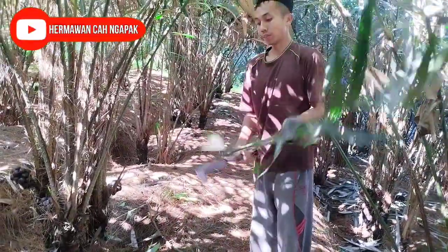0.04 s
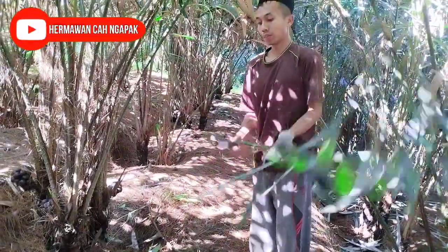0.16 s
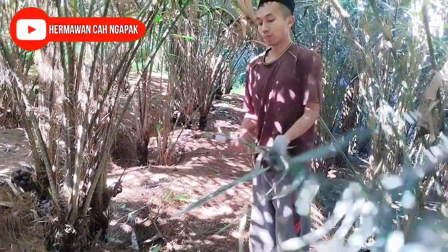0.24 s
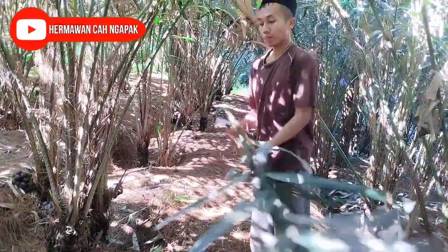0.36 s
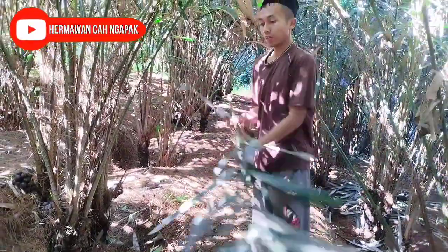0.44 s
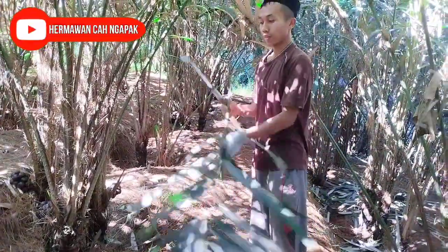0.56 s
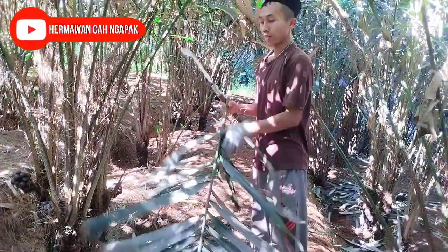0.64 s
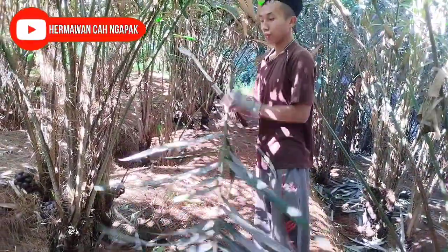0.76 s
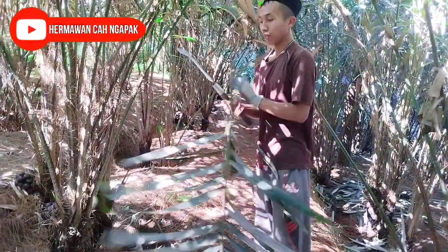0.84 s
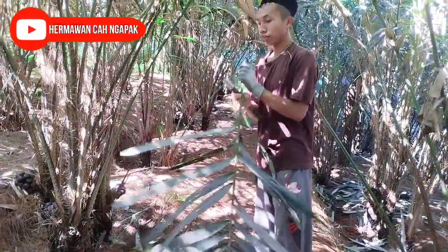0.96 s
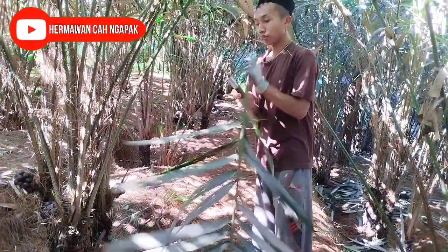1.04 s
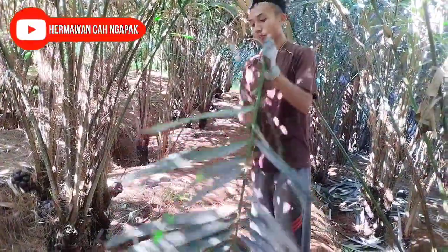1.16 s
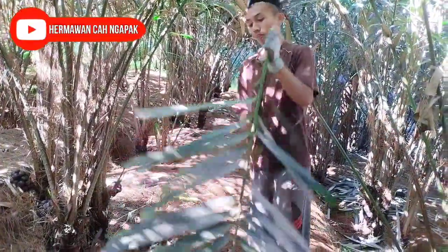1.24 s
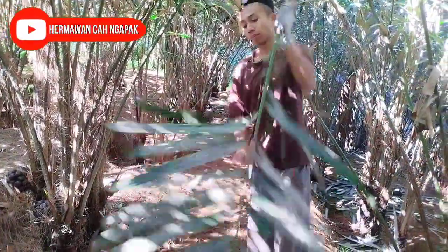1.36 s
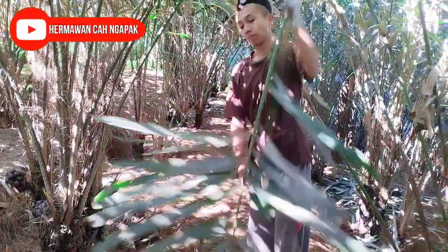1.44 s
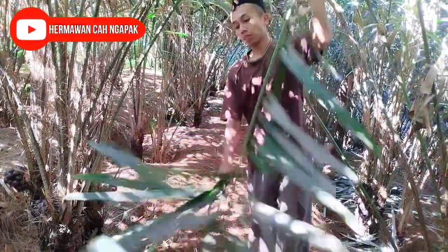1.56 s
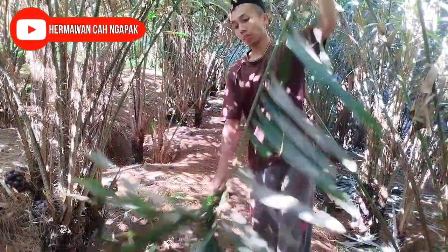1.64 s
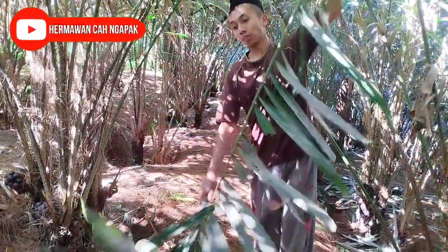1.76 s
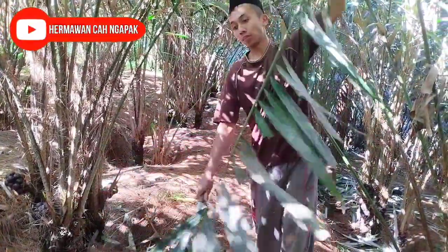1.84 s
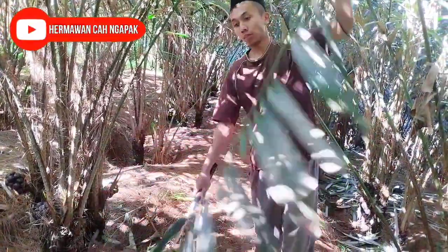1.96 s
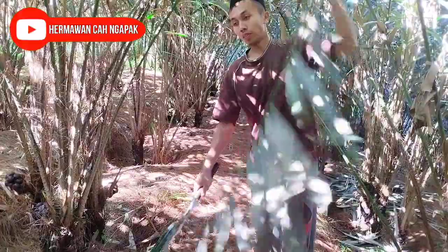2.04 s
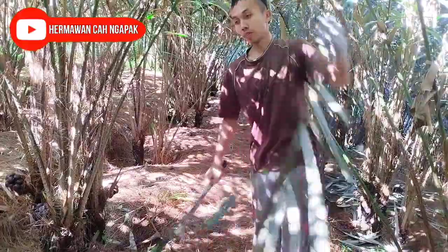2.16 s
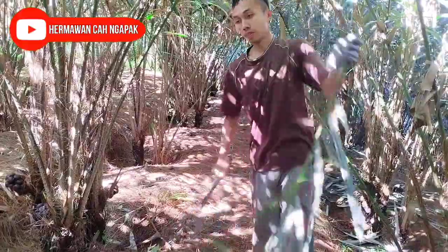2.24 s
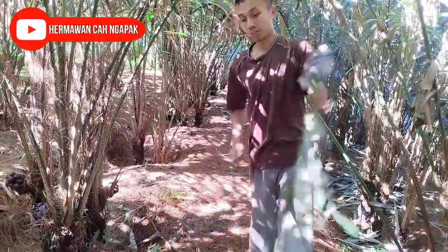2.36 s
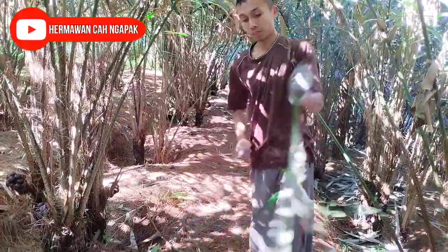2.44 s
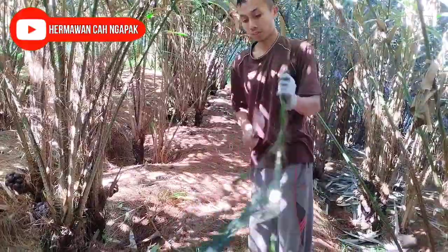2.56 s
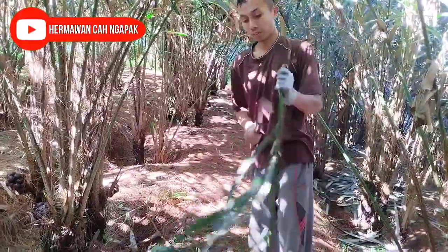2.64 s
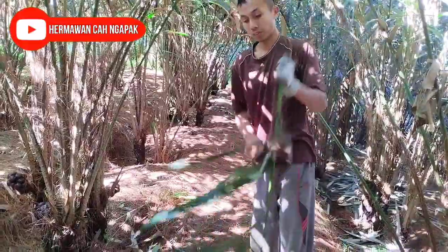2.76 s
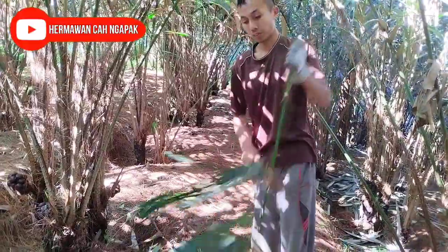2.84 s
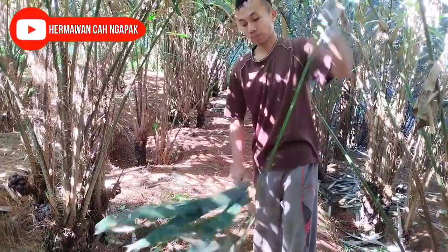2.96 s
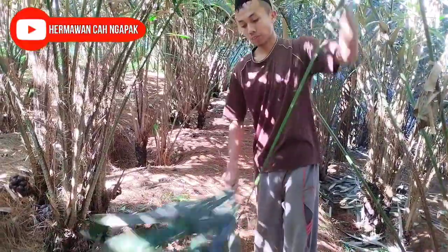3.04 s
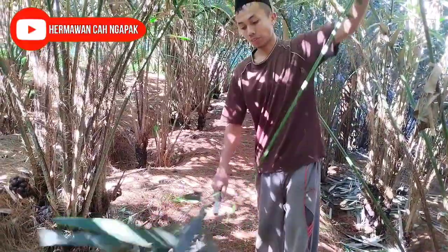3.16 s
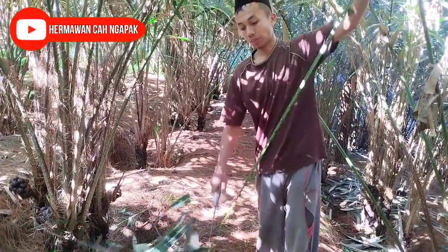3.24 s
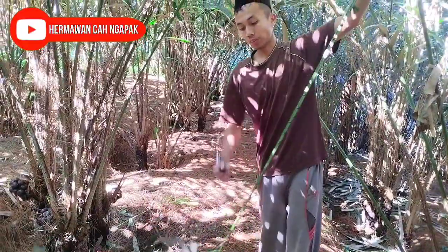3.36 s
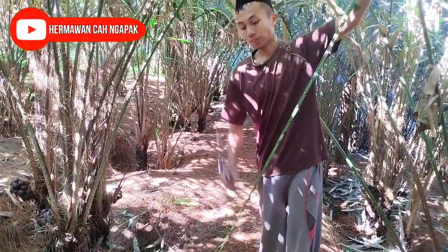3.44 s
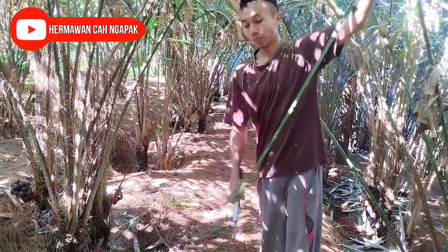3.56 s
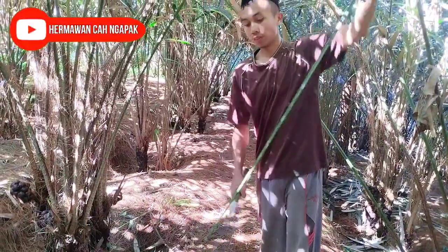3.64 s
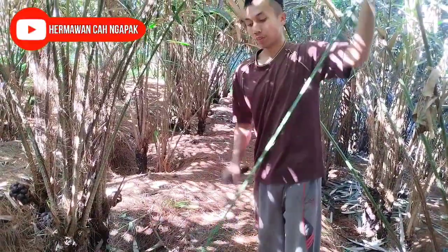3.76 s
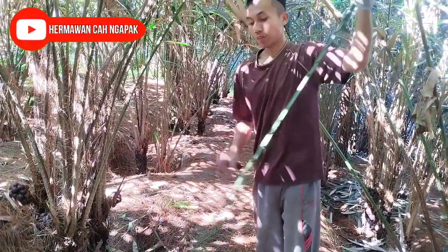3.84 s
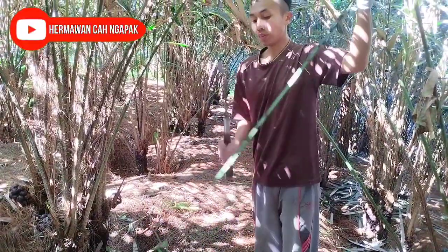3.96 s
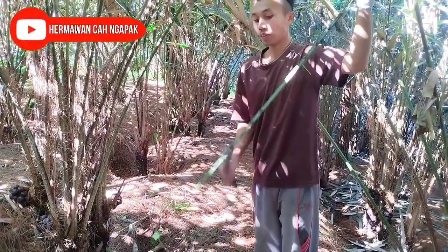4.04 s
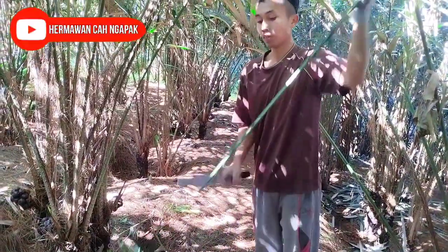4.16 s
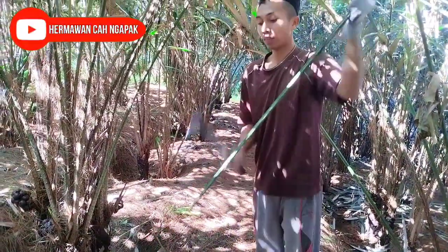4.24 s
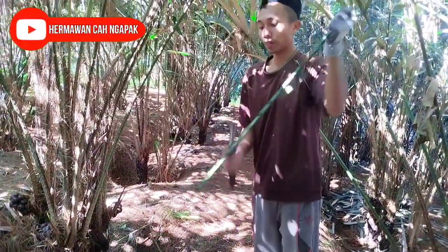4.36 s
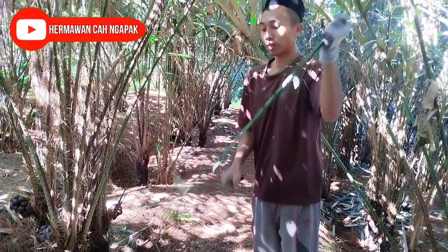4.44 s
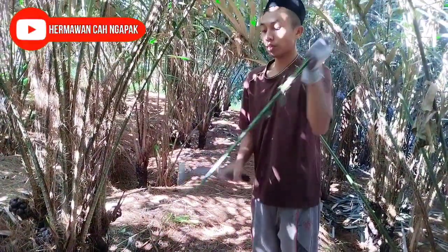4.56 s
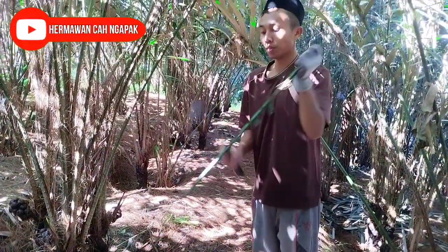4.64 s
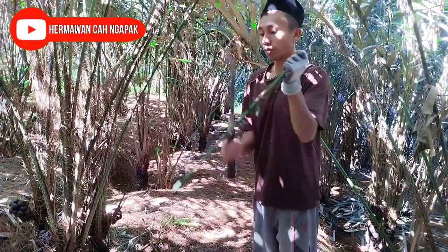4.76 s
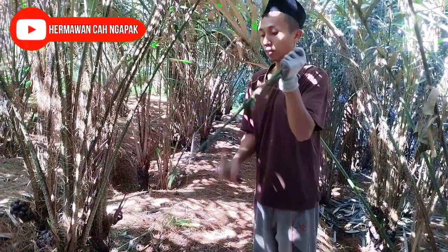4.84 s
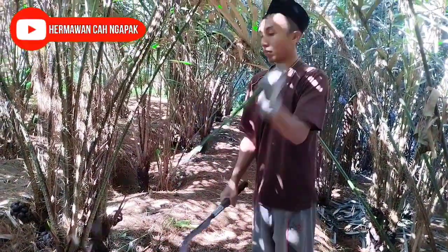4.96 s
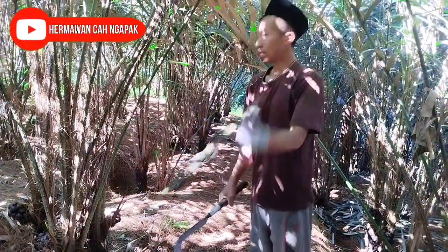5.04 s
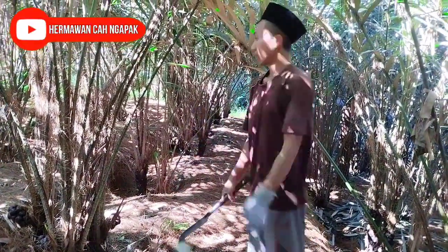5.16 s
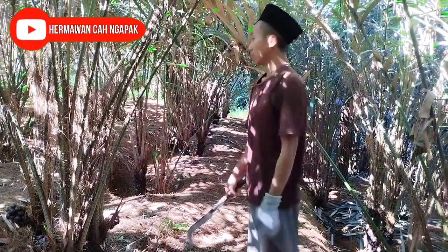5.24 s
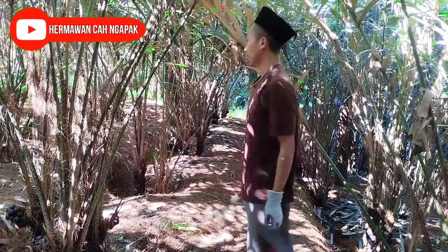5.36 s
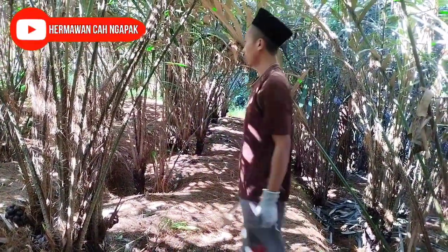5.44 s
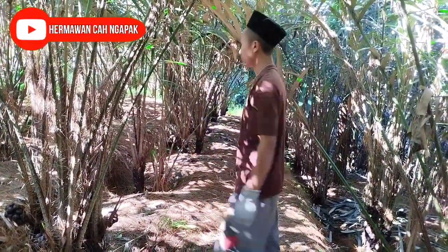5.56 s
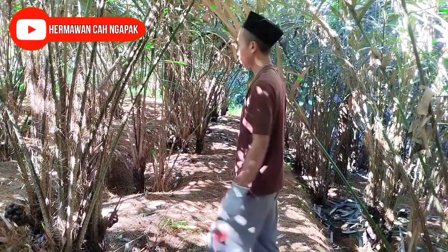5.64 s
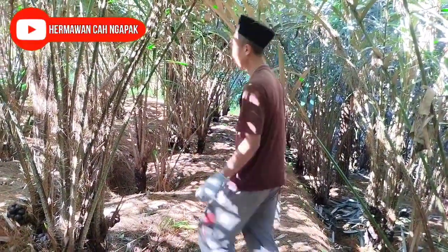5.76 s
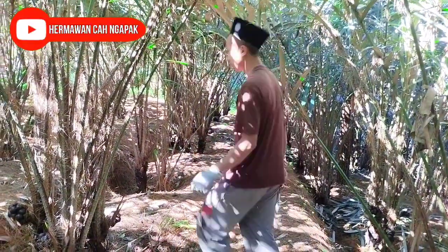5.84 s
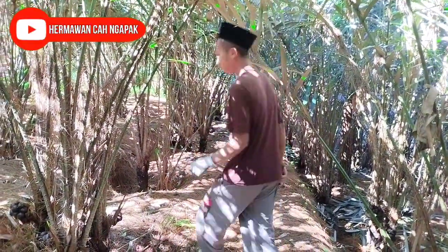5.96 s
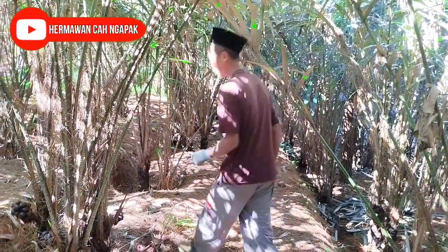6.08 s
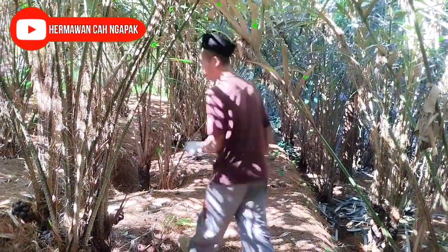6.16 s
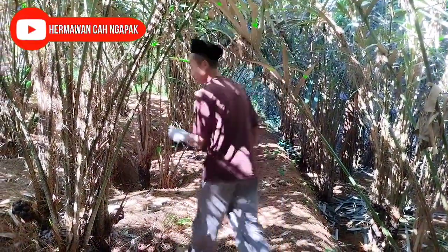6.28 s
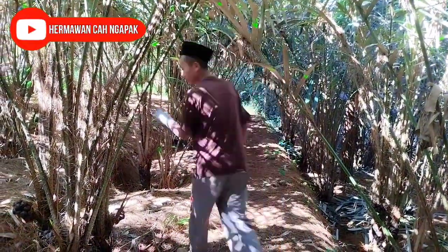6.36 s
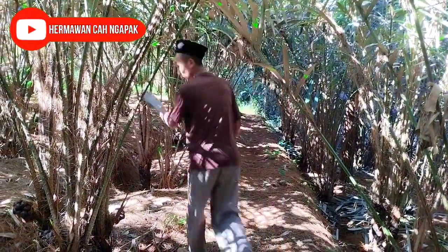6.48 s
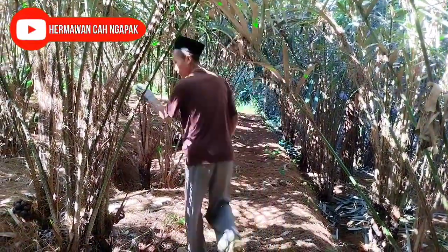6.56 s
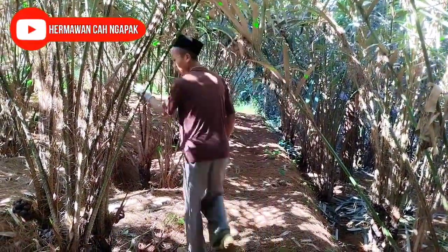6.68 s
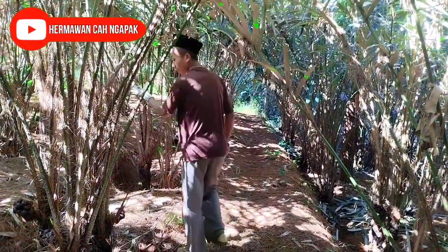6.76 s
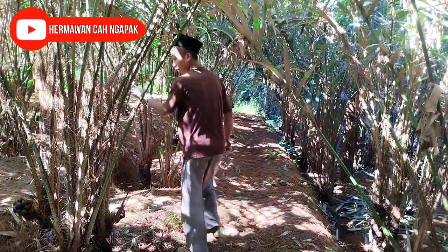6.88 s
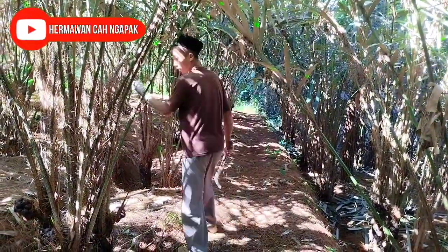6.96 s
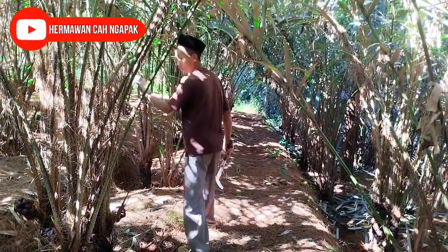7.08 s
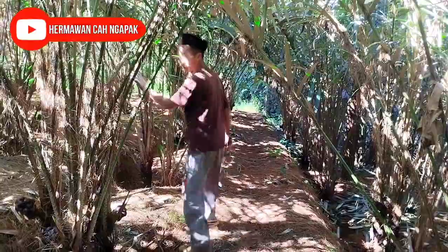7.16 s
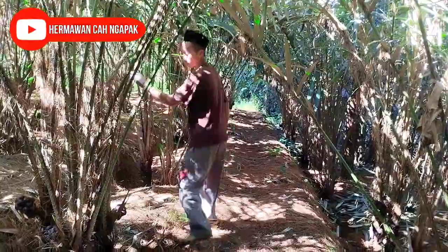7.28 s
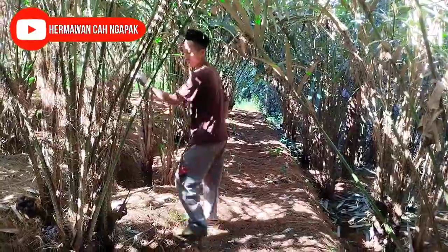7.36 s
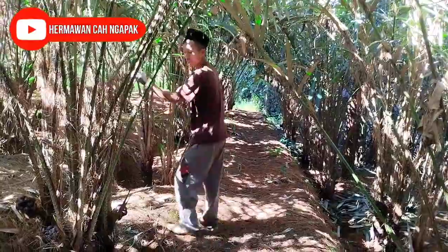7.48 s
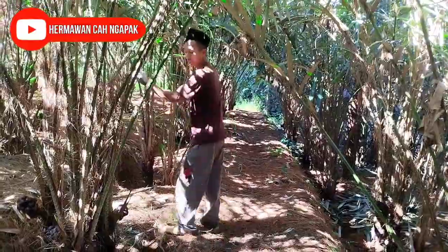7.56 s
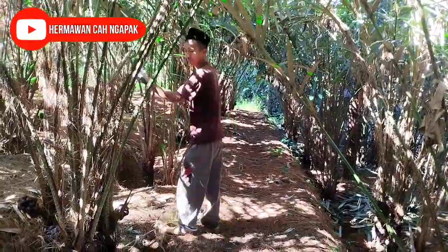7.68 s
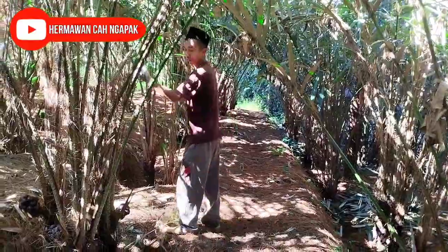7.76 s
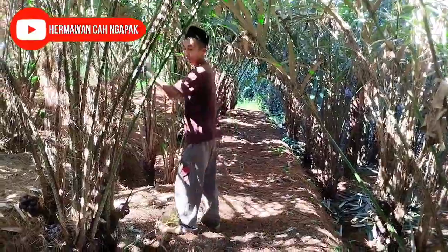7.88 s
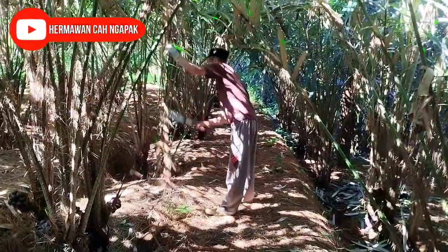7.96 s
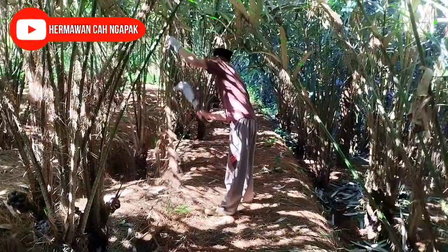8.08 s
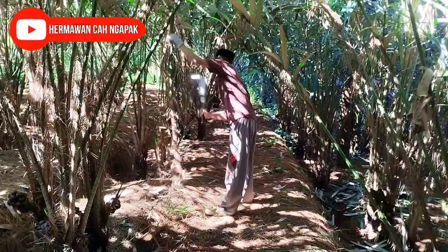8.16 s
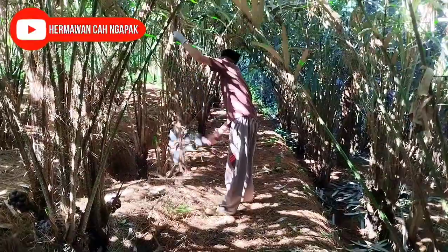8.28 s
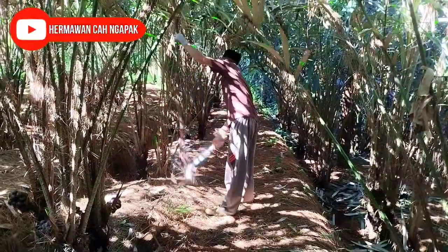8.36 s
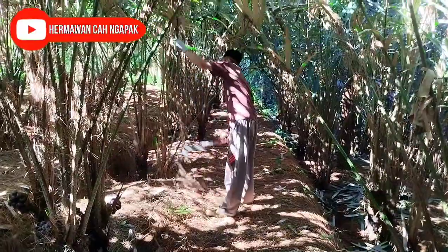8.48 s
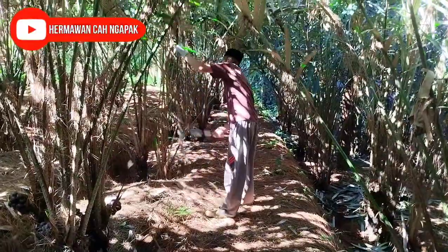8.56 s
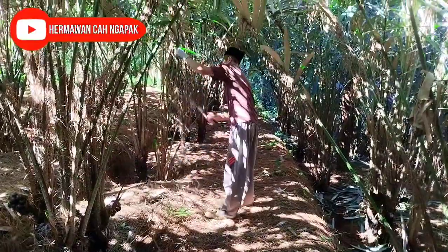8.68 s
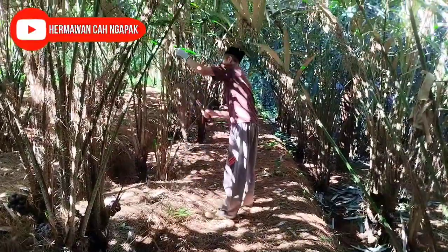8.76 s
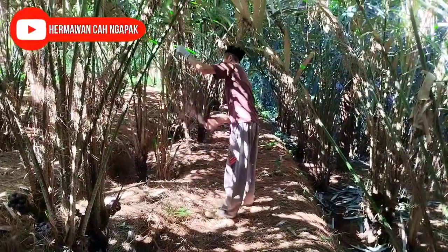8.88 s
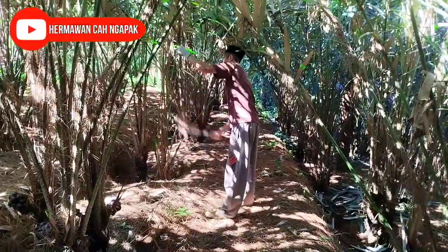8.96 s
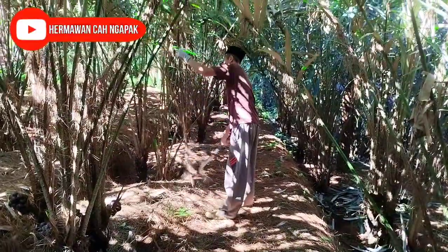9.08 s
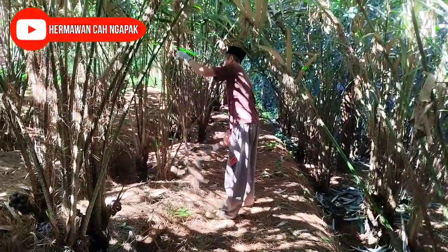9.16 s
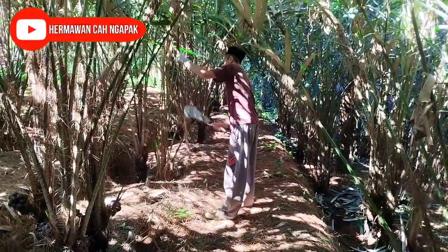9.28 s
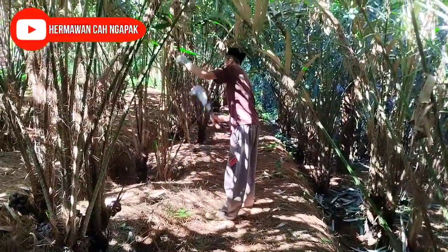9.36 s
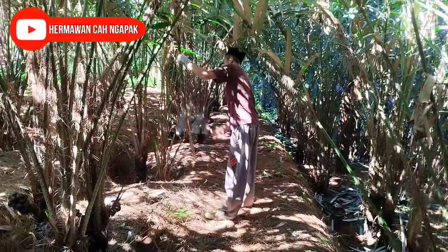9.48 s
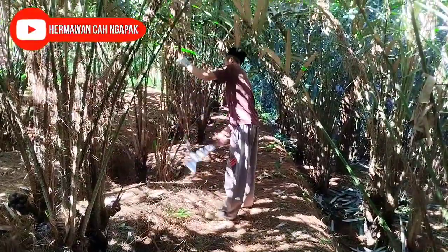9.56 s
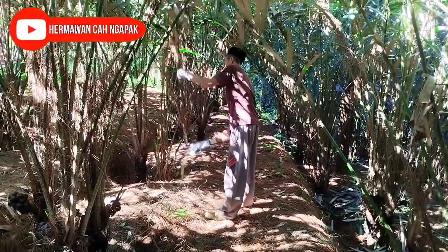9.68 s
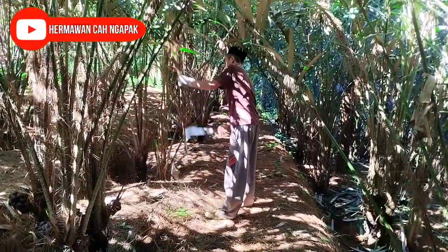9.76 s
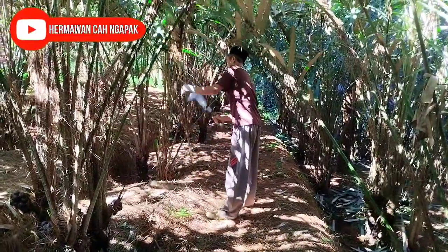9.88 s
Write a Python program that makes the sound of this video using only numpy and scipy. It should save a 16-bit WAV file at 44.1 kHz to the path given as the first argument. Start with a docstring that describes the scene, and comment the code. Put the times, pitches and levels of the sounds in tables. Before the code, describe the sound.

Close to the microphone in an outdoor grove, a dry frond is dragged and shaken with harsh leafy rustles and dense brittle snaps. Separate crisp blade chops follow, with brief faint metallic ringing. Soft steps shuffle away over dry litter, then rustling and sparse cuts continue farther off. Insects hiss thinly, a distant engine drones low, and small birds chirp faintly.

```python
"""In a grove, a spiny palm frond is dragged from its clump, stripped of its leaflets and chopped with a curved blade.
Leaves rustle, fibres snap and the blade rings briefly; after a few steps on dry litter the cutting goes on farther off.
Leaves, breaks and steps are bursts of tiny random clicks shaped by filters; stalk and blade ring as fading tones.
Stems echo softly, small birds chirp, insects hiss, and a distant engine drones with a thin whine."""
import sys
import numpy as np
from scipy import signal
from scipy.fft import rfft, irfft, next_fast_len
from scipy.io import wavfile

SR = 44100
rng = np.random.default_rng(int(sys.argv[2]) if len(sys.argv) > 2 else 0)


def put_to_file(sound):
    """Save the sound as 16-bit audio at rate SR, in the file named by the first command-line argument."""
    columns = np.atleast_2d(sound).T  # one column per channel
    safe = np.clip(columns, -1, 1)
    whole_steps = np.round(safe * 32767)
    wavfile.write(sys.argv[1], SR, whole_steps.astype(np.int16))


N = 437031
TIME = np.arange(N) / SR  # seconds

# Tugs and sweeps of the frond. Each row: start in seconds, rubbing level in dB before the band trims,
# rise in seconds, hold in seconds, time to fade by 60 dB in seconds,
# then flexing and scratching in dB relative to the rubbing.
SWEEPS = [(0.0, -30, 0.0013, 0.014, .17, -8.5, 0.5), (0.066, -47, 0.017, 0.05, 0.36, -3.5, -3),
          (0.15, -44, .005, 0.0091, 0.43, -6, -3), (0.226, -37.5, 0.029, 0.011, 0.26, -6.5, -4),
          (0.288, -26, 0.016, 0.029, .3, -11, -7), (0.35, -24.5, 0.017, 0.017, 0.74, -8, -7.5),
          (0.726, -47, .008, 0.058, 0.6, -6, -5), (0.958, -52.5, 0.0079, 0.12, .3, -5, -4.5),
          (1.095, -27.5, 0.0041, 0.0089, 0.46, -5.5, -6), (1.171, -30.5, .008, 0.019, 0.2, -10, -3.5),
          (1.229, -29, 0.0075, 0.039, 0.45, -4, -7), (1.35, -31.5, .005, 0.086, 1.03, -4.5, -5),
          (1.483, -30, 0.077, 0.069, 0.67, -11, -11.5), (1.771, -36, 0.0072, 0.095, .4, -6.5, -7.5),
          (1.842, -26.5, 0.1, .01, 0.53, -12.5, -10.5), (2.011, -35.5, 0.044, 0.27, 0.46, -12, -9),
          (2.401, -43, .015, 0.094, .3, -9, -9), (2.559, -39.5, .005, 0.037, 0.33, -7.5, 2),
          (2.61, -31, 0.029, 0.013, 0.18, -6.5, -6), (2.697, -31, 0.028, 0.077, .4, -8, -4),
          (2.844, -28, 0.0077, 0.023, .22, -8, 0), (2.903, -28.5, 0.014, 0.026, 0.48, -9, -7),
          (2.998, -34.5, 0.086, 0.24, .6, -10.5, -9.5), (3.341, -30, .007, .01, .25, -8.5, -8),
          (3.418, -35, 0.017, .06, 0.5, -11, -9), (3.71, -40.5, 0.019, .015, 0.47, -6.5, -9),
          (4.297, -59.5, .05, .13, 0.47, -12, -13), (5.23, -47, 0.03, 0.18, 0.64, -9.5, -12),
          (7.548, -48.5, 0.0086, 0.057, .3, -20, -4), (7.589, -35, 0.076, 0.041, .08, -14, -2.5),
          (7.724, -37.5, 0.083, .01, 0.47, -5, -6), (7.882, -47.5, .04, .015, 2.7, -5, -10),
          (8.212, -49.5, 0.12, 0.037, 1.13, -8, -5.5), (8.639, -42.5, .006, 0.02, .2, -5.5, 2),
          (8.677, -33, .02, 0.011, 0.36, -13.5, -5), (8.758, -34.5, 0.04, 0.0086, 0.2, -10, -1),
          (8.86, -53.5, 0.1, 0.075, 1, -6.5, -7), (9.348, -45, 0.063, .03, .4, -3.5, -7),
          (9.45, -40, 0.028, .015, 0.44, -7.5, -6), (9.517, -38.5, 0.026, 0.022, 0.74, -5, -7)]
# Louder leaflets and twigs snapping. Each row: time in seconds, level in dB before the snaps' shared trim,
# brightness in dB per octave, rib resonance in Hz.
SNAPS = [(0.1555, -23, 1.5, 2980), (0.5104, -31, -2, 3650), (0.6616, -24.5, 0.5, 3600),
         (0.7497, -25.5, -0.5, 3740), (1.178, -11.5, -1, 4300), (1.1923, -11.5, -4, 5400),
         (1.2391, -15.5, 4, 3500), (1.2513, -14.5, 2, 2340), (1.268, -9.5, 1, 3340),
         (1.3556, -10, -1.5, 5570), (1.3896, -18, -5, 3400), (1.451, -17, 2, 4550),
         (1.7742, -19, 1.5, 3770), (2.0097, -14.5, 1.5, 3660), (2.153, -21, 2, 3230),
         (2.2383, -16, 0.5, 3500), (2.3067, -20, -0.5, 3500), (2.565, -17, 3, 6100),
         (2.6292, -17.5, 2.5, 6300), (2.646, -11, 3.5, 2920), (2.704, -13.5, 2, 5880),
         (2.7218, -7.5, 0, 5000), (2.7653, -11.5, -1, 3300), (2.7856, -9, -1.5, 3300),
         (2.8012, -13, -1, 4700), (3.194, -18, -2.5, 3800), (3.348, -13, 3.5, 3620), (3.437, -24, 1, 3920),
         (3.693, -23.5, 0, 4000), (3.7377, -22, 2.5, 3700), (5.375, -36, -2, 4200),
         (5.535, -38.5, -2, 4000), (6.2088, -26.5, 2, 6340), (6.8898, -25, -3, 4460),
         (6.9415, -27, -0.5, 4560), (7.3128, -42.5, -2, 3800), (7.438, -37.5, 3, 4620),
         (7.464, -37, 2, 6180), (7.6393, -18, 5, 5230), (7.8043, -21, 2, 6100), (8.965, -28.5, 0.5, 2260)]
# Blade through the stalk. Each row: time in seconds, level in dB, length of the break in seconds,
# brightness in dB per octave, stalk resonance in Hz, blade ring in dB.
CHOPS = [(3.92, -18.5, 0.0049, 0.5, 5870, -30), (4.265, -19, 0.0067, 0, 5800, -37),
         (4.683, -16.5, 0.0067, -0.5, 6050, -40), (5.006, -20, 0.0028, -4, 4000, -53),
         (5.126, -23, 0.0049, -5, 3150, -57), (5.199, -20, 0.0025, -4, 3570, -51),
         (5.203, -21.5, 0.0073, -4, 2970, -54), (7.667, -27, 0.0055, 0.5, 5670, -47),
         (8.0948, -17.5, 0.0046, -1, 5800, -49), (8.693, -29.5, 0.0095, -1, 5340, -36),
         (9.309, -20, 0.0051, -1.5, 2720, -41), (9.848, -22, 0.006, -1.5, 4020, -52)]
# Blade sliding along the fibres. Each row: time in seconds, level in dB, length in seconds,
# brightness in dB per octave.
SLICES = [(4.206, -24.5, 0.0074, -0.5), (4.221, -30.5, 0.029, -.5), (4.574, -29, 0.022, -1),
          (4.608, -27.5, 0.012, -1), (4.976, -46, .01, 3), (4.986, -29, .01, -1),
          (5.012, -26.5, 0.0088, -0.5), (5.132, -28, 0.023, -2.3), (5.213, -26.5, 0.0074, -1.5),
          (9.32, -43, .015, 5), (9.861, -38, 0.018, -1)]
# Hollow knocks of the cut stalk. Each row: time in seconds, level in dB.
KNOCKS = [(5.128, -30.5), (5.2, -42)]
# Ringing tones of stalk and blade. Each row: pitch in Hz, average relative strength in dB,
# time to fade by 60 dB in seconds.
STALK_MODES = [(646, 0, .14), (560, -5, .08), (730, -8, .06), (1150, -13, .06)]
BLADE_MODES = [(2000, -2, .09), (2590, -3, .09), (5850, -2, .08), (6780, -13, .05)]
# Soft bumps of frond and feet. Each row: time in seconds, level in dB, pitch of the thud in Hz.
BUMPS = [(1.24, -41, 474), (1.356, -39, 400), (3.093, -39, 395), (6.889, -52, 300)]
# Feet on dry litter. Each row: start in seconds, level in dB.
STEPS = [(5.58, -56), (5.67, -56), (5.78, -63), (5.96, -59), (6.08, -59), (6.19, -48), (6.29, -57),
         (6.45, -59.5), (6.85, -52), (6.95, -55), (7.045, -54), (7.33, -60)]
# A footfall presses the litter down and lets it settle.
STEP_RISE_S, STEP_HOLD_S, STEP_T60_S = 0.025, 0.014, 0.43
# Small birds. Each row: start in seconds, level in dB, middle pitch in Hz.
CHIRPS = [(7.07, -55, 7400), (7.13, -60, 2750), (7.193, -53, 3200), (7.378, -60, 2750)]

# Colours, meaning the balance of low and high in each sound.
# Each row: frequency in Hz, relative strength in dB per Hz.
LEAF_COLOUR = [(76, -85), (130, -15), (309, -14.5), (363, -11), (522, -8), (706, -14), (1220, -10.5),
               (1710, -16), (1970, -9.5), (3200, -1), (3610, 1.5), (9290, -13.5), (11600, -9.5),
               (15100, -24), (16000, -38)]
FAR_LEAF_COLOUR = [(76, -41), (130, -14), (156, -19), (444, -15), (638, -18), (720, -16.5), (954, -10),
                   (1290, -16.5), (2180, -9), (3530, -2.5), (4070, -3.5), (4980, -1), (8400, -11),
                   (11100, -9), (16000, -23)]
SNAP_COLOUR = [(76, -19.5), (130, -24), (370, -14.5), (613, -7.5), (1140, 0), (1780, -4.5), (1970, 2),
               (2510, 3.5), (3330, 3.5), (4150, 0.5), (4780, 4.5), (11600, -9), (16000, -23)]
CHOP_COLOUR = [(76, -63), (130, -26.5), (554, -16), (1140, -7.5), (1370, -10.5), (1490, -7.5), (1710, -12),
               (2010, -7), (2180, -2.5), (2830, -1), (4240, 1), (5730, 3), (6730, 1.5), (11400, -2.5),
               (16000, -17.5)]
SLICE_COLOUR = [(76, -48), (130, -21), (253, -16), (394, -11), (625, -6), (954, -14.5), (1240, -8),
                (2510, -4.5), (2950, 3.5), (3830, 3.5), (5960, -4), (6470, -4), (10500, -9.5), (12600, -12),
                (16000, -29)]
AIR_COLOUR = [(15, -2.5), (30, 2.5), (50, -4.5), (100, -5), (200, -14), (400, -18), (900, -20.5),
              (1800, -19), (3500, -24.5), (7000, -50), (13000, -43), (16000, -48)]
CANOPY_COLOUR = [(700, -39), (2000, -4), (3300, -1.5), (5000, 0.5), (8000, -3), (12000, -20), (16000, -17)]
INSECT_COLOUR = [(7000, -28), (8300, -11.5), (9400, -2.5), (10500, 0.5), (11500, -6), (12600, -17.5),
                 (14500, -30)]

# Speed of the distant engine. Each row: time in seconds, firings per second.
ENGINE_SPEED = [(0, 67.7), (1, 69.2), (2, 73), (2.2, 71), (2.7, 70.5), (2.9, 72.2), (3.6, 73), (4.35, 75.2),
                (4.7, 74.2), (6, 74.7), (6.35, 76), (6.5, 74.6), (7.15, 77), (7.6, 71), (7.75, 65.3),
                (8.7, 63), (9.5, 60), (9.9, 56)]
# Loudness of its firing note. Each row: time in seconds, level in dB before the engine trim and waver.
ENGINE_LEVEL = [(0.0, -61.5), (1.74, -53.5), (2.59, -56.5), (2.73, -68), (2.87, -51.5), (4.99, -64),
                (5.11, -72), (7.2, -64), (7.34, -72), (7.84, -48), (7.92, -52.5), (9.55, -56.5), (9.8, -60),
                (9.91, -58)]
# Its faint upper tones. Each row: multiple of the firing rate, average level in dB.
ENGINE_ORDERS = [(5, -80), (8, -75.5), (14, -74), (15, -79)]
# The engine's octave swells as the revs bring it onto an exhaust resonance (level before the engine trim).
OCTAVE_DB, EXHAUST_HZ, EXHAUST_WIDTH_HZ, EXHAUST_LIFT_DB = -68, 153.1, 3, 10
# A faint far whine. Each row: time in seconds, middle pitch in Hz, level in dB before the whine trim.
WHINE = [(5.8, 926, -78), (6.08, 930, -59), (6.4, 933, -67), (6.62, 930, -66), (7.0, 940, -83),
         (7.3, 930, -68), (7.6, 912, -69), (8.0, 905, -76)]
AIR_DB, CANOPY_DB, INSECT_DB = -57.5, -72, -55.5
CRICKET_HZ, CRICKET_DB = 4630, -73
CUTOFF_HZ = 16000


def effort():
    """Strength of rubbing, flexing and scratching over time; overlapping sweeps add in power."""
    power = np.zeros((3, N))
    for s, db, rise, hold, t60, flex_db, scratch_db in SWEEPS:
        shape = swell(rise, hold, t60)
        for track, share_db in zip(power, (0, flex_db, scratch_db)):
            add(track, s, from_db(db + share_db) ** 2 * shape)
    return np.sqrt(power)


def swell(rise, hold, t60, count=60000):
    """Power of one movement: it builds up, holds and dies away."""
    t = np.arange(count) / SR
    build = np.minimum(t / rise, 1)
    fade = from_db(-60 * np.maximum(t - rise - hold, 0) / t60)
    return (build * fade) ** 2


def rustle(gains, mid_db=-0.64, low_db=-1.77, treble_db=-1.3):
    """Each movement rubs leaf blades (mid), flexes whole leaves (low) and scratches with spines (treble)."""
    flicks = leaflets()
    near = leaves(LEAF_COLOUR, clump_db=3.0, spread_db=2.5, hiss_db=-3.0, flicks=from_db(-5.5) * flicks)
    far = leaves(FAR_LEAF_COLOUR, clump_db=2.5, spread_db=1.5, hiss_db=-3.5, flicks=from_db(-4.5) * flicks)
    source = np.where(TIME < 7, near, far)  # the work goes on farther off from 7 s
    zones = [(1800, 7500), (130, 1800), (7500, 17000)]  # Hz, in the order of the gains
    out = np.zeros(N)
    for zone, zone_db, gain in zip(zones, (mid_db, low_db, treble_db), gains):
        band_filter = signal.butter(4, zone, "band", fs=SR, output="sos")
        band = rms_one(signal.sosfilt(band_filter, source))
        out += from_db(zone_db) * gain * band
    return out


def leaves(colour, clump_db, spread_db, hiss_db, flicks=0):
    """Dry leaves catch and slip: clumped crackles and any flicks over a smooth rubbing hiss."""
    clicks = grains(N, 5000, spread_db)
    clumping = from_db(clump_db * (drift(260) + 0.96 * drift(90)))
    crackle = rms_one(clicks * clumping)
    hiss = from_db(hiss_db) * rng.standard_normal(N)
    return rms_one(coloured(crackle + flicks + hiss, colour))


def leaflets(sharpness=28, per_s=45, count=26):
    """Leaflets of many sizes flick against each other, each ringing for a moment at its own pitch."""
    pitches = np.geomspace(700, 9000, count) * rng.uniform(.96, 1.04, count)
    out = np.zeros(N)
    for hz in pitches:
        flicks = grains(N, per_s, 3.0) + 1e-18
        ringing = signal.lfilter(*signal.iirpeak(hz, sharpness, fs=SR), flicks)
        out += np.sqrt(hz) * rms_one(ringing)
    return rms_one(out)


def snaps(rubbing, level_db=-9, bite_s=.001, tick_db=9):
    """A leaflet's rib gives one sharp tick and breaks within a few milliseconds, each with its own pitch."""
    out = np.zeros(N)
    for s, db, tilt_db, hz in list(SNAPS) + small_snaps(rubbing):
        burst = fracture(0.0035, bite_s, bite_db=-16, tail_t60=0.021, per_s=8000, spread_db=3.5)
        burst[round(2 * bite_s * SR)] += from_db(tick_db)
        snap = resonant(coloured(burst, SNAP_COLOUR, tilt_db), hz, sharpness=10.6, peak_db=5)
        add(out, s - bite_s, from_db(db + level_db) * snap)
    return out


def small_snaps(rubbing, above_db=8, spread_db=2.2, rib_hz=3900, count=190):
    """Lesser ribs break at random, harder where the leaves are rubbed harder; rows as in SNAPS."""
    at = rng.integers(0, N, count)
    size, tilt, pitch = rng.standard_normal((count, 3)).T
    db = 20 * np.log10(rubbing[at] + 1e-6) + above_db + spread_db * size
    hz = rib_hz * 2 ** (.3 * pitch)
    return list(zip(at / SR, db, 2 * tilt, hz))


def chops(bite_s=0.0036):
    """The blade bites, breaks through the stalk and rings; the loose stalk knocks."""
    out = np.zeros(N)
    for s, db, length, tilt_db, hz, ring_db in CHOPS:
        burst = fracture(length, bite_s, bite_db=-16.5, tail_t60=0.024, per_s=11000, spread_db=3.5)
        chop = resonant(coloured(burst, CHOP_COLOUR, tilt_db), hz, sharpness=37, peak_db=1)
        add(out, s - bite_s, from_db(db) * chop)
        add(out, s, from_db(ring_db) * ring(BLADE_MODES, spread_db=1.5))
    for s, db in KNOCKS:
        add(out, s, from_db(db) * ring(STALK_MODES, spread_db=1.2))
    return out


def slices(bite_s=.002):
    """The edge catches, runs along the stalk and rips fibre after fibre."""
    out = np.zeros(N)
    for s, db, length, tilt_db in SLICES:
        burst = fracture(length, bite_s, bite_db=-18, tail_t60=0.12, per_s=8400, spread_db=2.5)
        add(out, s - bite_s, from_db(db) * coloured(burst, SLICE_COLOUR, tilt_db))
    return out


def fracture(length, bite_s, bite_db, tail_t60, per_s, spread_db, count=8000):
    """The first fibres yield softly, the bundle gives way for `length`, then the stragglers die out."""
    t = np.arange(count) / SR - bite_s
    fade = from_db(-60 * np.maximum(t - length, 0) / tail_t60)
    force = np.where(t < 0, from_db(bite_db), fade)
    burst = force * grains(count, per_s, spread_db)
    return rms_one(burst) * np.sqrt(np.mean(force ** 2))


def ring(modes, spread_db, count=12000):
    """A struck solid rings in several fading tones, whose strengths are drawn anew each time."""
    t = np.arange(count) / SR
    out = np.zeros(count)
    for hz, db, t60 in modes:
        level = from_db(db + spread_db * rng.normal() - 60 * t / t60)
        out += level * np.cos(2 * np.pi * hz * t)
    return out


def bumps():
    """A soft contact gives a short dull thud."""
    out = np.zeros(N)
    for s, db, hz in BUMPS:
        push = fracture(0.0032, 0, 0, tail_t60=0.034, per_s=9000, spread_db=3.0)
        band_filter = signal.butter(2, [hz / 1.3, hz * 1.6], "band", fs=SR, output="sos")
        thud = signal.sosfilt(band_filter, push)
        add(out, s, from_db(db) * rms_one(thud) * np.std(push))
    return out


def shuffle():
    """Dry litter crackles softly as each footfall presses it down and lets it settle."""
    power = np.zeros(N)
    for s, db in STEPS:
        add(power, s, from_db(db) ** 2 * swell(STEP_RISE_S, STEP_HOLD_S, STEP_T60_S))
    litter = leaves(FAR_LEAF_COLOUR, clump_db=3.0, spread_db=3.5, hiss_db=-5)
    return np.sqrt(power) * litter


def grove(x, near_db=-7, near_t60=0.16, far_db=-25, far_t60=0.54, far_hz=4500, count=30000, size=2048):
    """Stems close by scatter a short dense echo, with paths that keep changing; the wider grove a dull one."""
    t = np.arange(count) / SR
    near_fade, far_fade = [rms_one((t > .003) * from_db(-60 * t / t60)) / np.sqrt(count)
                           for t60 in (near_t60, far_t60)]
    near = np.zeros(N)
    window = np.sqrt(signal.windows.hann(size, sym=False))
    # overlapping short pieces of sound, each with freshly drawn paths
    for at in range(0, N - size // 2, size // 2):
        paths = near_fade[:count // 2] * rng.standard_normal(count // 2)
        piece = x[at:at + size] * window[:N - at]
        add(near, at / SR, signal.fftconvolve(piece, paths))
    dull_filter = signal.butter(2, far_hz, fs=SR, output="sos")
    far_paths = signal.sosfilt(dull_filter, far_fade * rng.standard_normal(count))
    far = signal.oaconvolve(x, far_paths)[:N]
    return from_db(near_db) * near + from_db(far_db) * far


def birds(length=0.032, fall=0.024):
    """Small birds give short, rough, slightly falling chirps: a gliding tone with a jittery pitch."""
    out = np.zeros(N)
    u = np.linspace(0, 1, round(length * SR))  # progress through one chirp
    for s, db, hz in CHIRPS:
        pitch = hz * (1 + fall * (.5 - u) + .07 * drift(900)[:len(u)])
        tone = np.sin(2 * np.pi * np.cumsum(pitch) / SR)
        add(out, s, from_db(db) * np.sin(np.pi * u) ** 2 * tone)
    return out


def distance(engine_db=2, whine_db=1, waver_db=1.0):
    """Far off, an engine's low orders and a thin whine carry unevenly through the trees."""
    firings, = in_time(ENGINE_SPEED)
    first_db, = in_time(ENGINE_LEVEL)
    # the octave is strongest on the exhaust resonance
    off_resonance = (2 * firings - EXHAUST_HZ) / EXHAUST_WIDTH_HZ
    second_db = OCTAVE_DB + EXHAUST_LIFT_DB / (1 + off_resonance ** 2)
    turn = 2 * np.pi * np.cumsum(firings) / SR + 0.19 * drift(8)  # slightly unsteady phase
    first = from_db(first_db + waver_db * drift(12)) * np.sin(turn)
    second = from_db(second_db) * np.sin(2 * turn)
    upper = np.zeros(N)
    for order, db in ENGINE_ORDERS:
        upper += from_db(db + 2.3 * drift(5)) * np.sin(round(order) * turn)
    hz, db = in_time(WHINE)
    to_nearest_end = np.minimum(TIME - WHINE[0][0], WHINE[-1][0] - TIME)
    fade = np.clip(to_nearest_end / .15, 0, 1)
    whine_gain = fade * from_db(db + 3.5 * drift(18))
    whine = whine_gain * np.sin(2 * np.pi * np.cumsum(hz + 7 * drift(60)) / SR)
    return from_db(engine_db) * (first + second) + upper + from_db(whine_db) * whine


def background():
    """Outdoor air, the canopy, an insect chorus whose high hiss wanders in pitch, and one thin trill."""
    air = from_db(AIR_DB) * coloured(rng.standard_normal(N), AIR_COLOUR)
    canopy = from_db(CANOPY_DB) * coloured(rng.standard_normal(N), CANOPY_COLOUR)
    # the complex form of the hiss lets its whole spectrum slide up and down
    hiss = coloured(rng.standard_normal(N), INSECT_COLOUR)
    chorus = signal.hilbert(hiss, next_fast_len(N))[:N]
    shift = 2 * np.pi * np.cumsum(270 * drift(9)) / SR
    insects = from_db(INSECT_DB + 1.3 * drift(5.3)) * np.real(chorus * np.exp(1j * shift))
    trill = from_db(CRICKET_DB) * drift(160) * np.sin(2 * np.pi * CRICKET_HZ * TIME)
    return air + canopy + insects + trill


def grains(count, per_s, spread_db):
    """Tiny fractures at random moments, a few much larger than the rest; rms 1."""
    sizes = from_db(spread_db * np.minimum(rng.exponential(1, count), 4))
    signs = rng.choice([-1, 1], count)
    happens = rng.random(count) < per_s / SR
    return rms_one(sizes * signs * happens)


def coloured(x, colour, tilt_db=0, size=4096):
    """Filter of unit power with the given colour, tilted by dB per octave; it never sounds early."""
    octave = np.log2(np.maximum(np.arange(size // 2 + 1), .5) * SR / size)
    hz, db = np.transpose(colour)
    gain = rms_one(from_db(np.interp(octave, np.log2(hz), db) + tilt_db * octave))
    # folding the cepstrum puts the filter's energy as early as possible
    cepstrum = irfft(np.log(gain + 1e-9))
    cepstrum[1:size // 2] *= 2
    cepstrum[size // 2 + 1:] = 0
    response = irfft(np.exp(rfft(cepstrum)))
    return signal.oaconvolve(x, response)[:len(x)]


def resonant(x, hz, sharpness, peak_db):
    """Lift one resonance out of a sound, keeping its energy."""
    y = x + from_db(peak_db) * signal.lfilter(*signal.iirpeak(hz, sharpness, fs=SR), x)
    return rms_one(y) * np.std(x)


def drift(rate):
    """Slow chance: straight lines between random points of spread 1, `rate` points per second."""
    knots = rng.standard_normal(4000)
    return np.interp(TIME * rate, np.arange(len(knots)), knots)


def in_time(rows):
    """Each column of a curve at every sample."""
    s, *columns = np.transpose(rows)
    return [np.interp(TIME, s, c) for c in columns]


def from_db(db):
    """Decibels to gain."""
    return 10 ** (np.asarray(db) / 20)


def rms_one(x):
    """Scale to unit rms (average strength)."""
    return x / np.sqrt(np.mean(x ** 2) + 1e-20)


def add(out, s, sound):
    """Mix a sound in at time s."""
    at = max(0, round(s * SR))
    out[at:at + len(sound)] += sound[:N - at]


def scene(leaf_echo_db=-5):
    """The work and the birds among the echoing stems, in front of the far sounds."""
    gains = effort()
    blows_and_birds = chops() + slices() + snaps(gains[0]) + bumps() + birds()
    foliage = rustle(gains) + shuffle()
    echo = grove(blows_and_birds + from_db(leaf_echo_db) * foliage)
    return (blows_and_birds + foliage + echo + distance() + background())[None]


def record(dry):
    """The top is cut steeply."""
    return signal.sosfilt(signal.ellip(10, .2, 70, CUTOFF_HZ, fs=SR, output="sos"), dry)


dry = scene()
out = record(dry)
put_to_file(out)
```